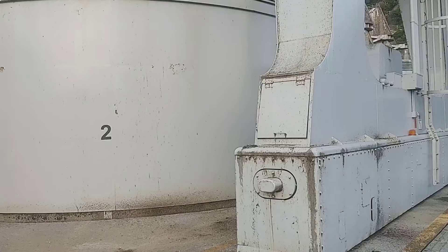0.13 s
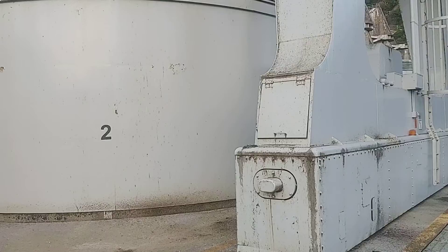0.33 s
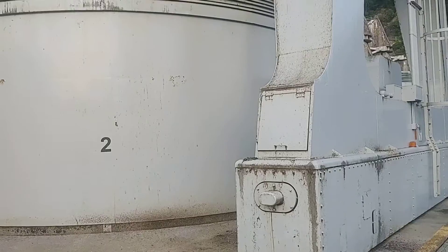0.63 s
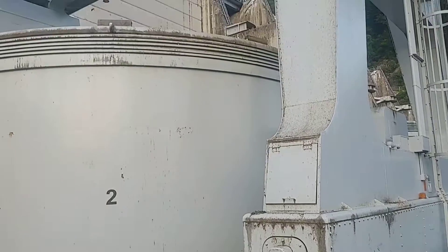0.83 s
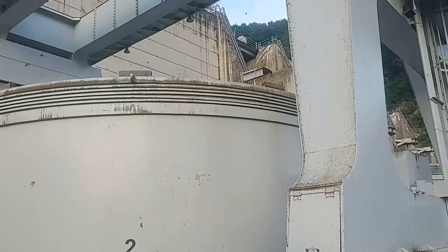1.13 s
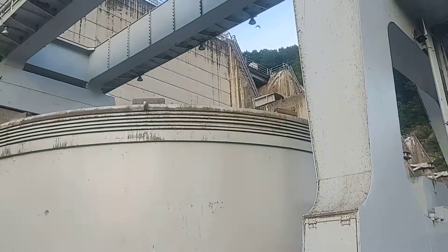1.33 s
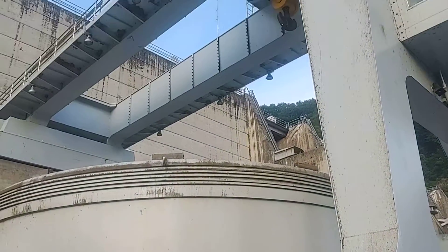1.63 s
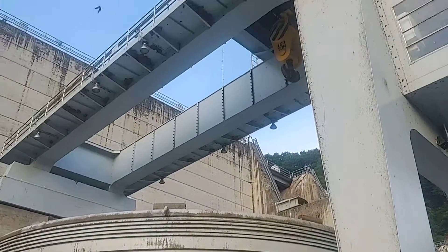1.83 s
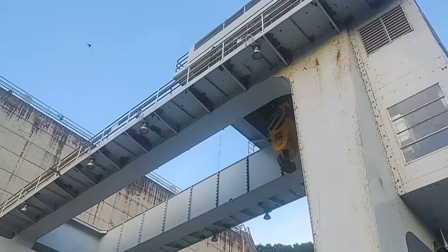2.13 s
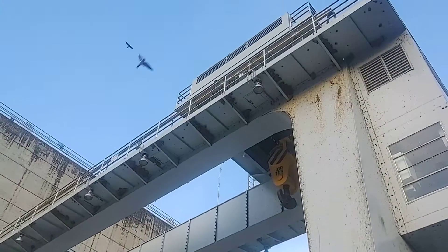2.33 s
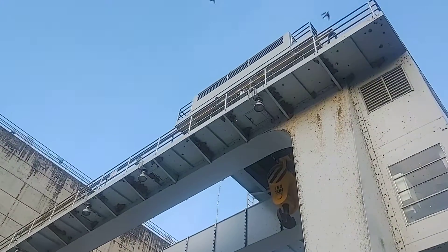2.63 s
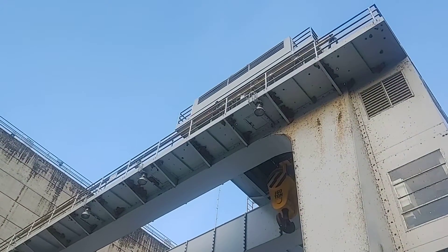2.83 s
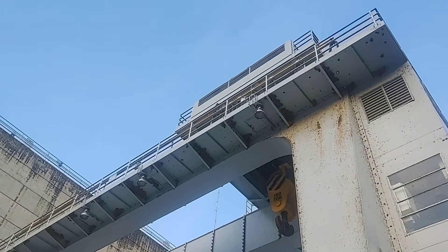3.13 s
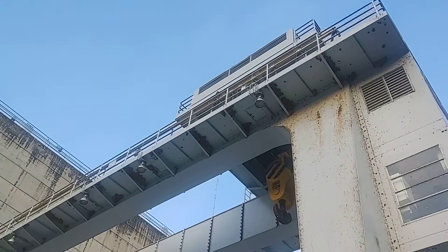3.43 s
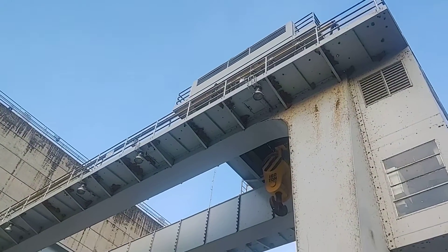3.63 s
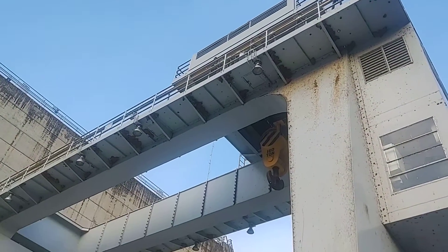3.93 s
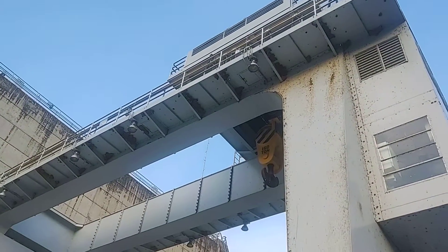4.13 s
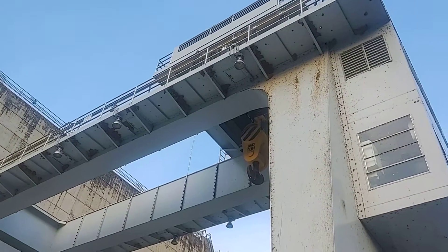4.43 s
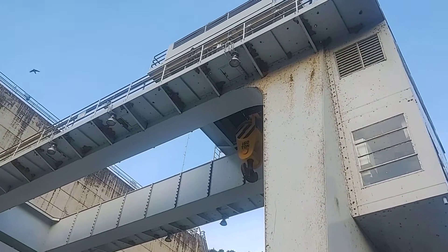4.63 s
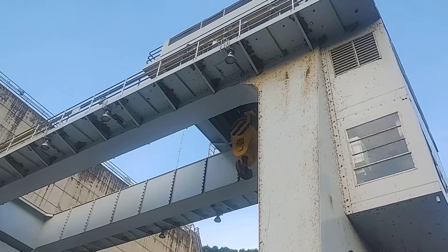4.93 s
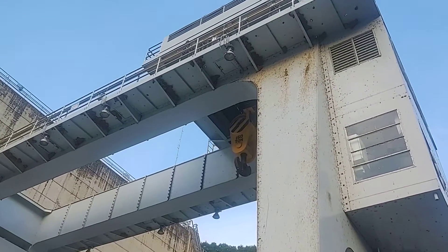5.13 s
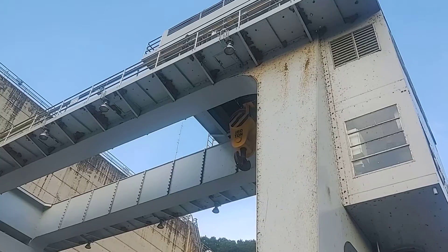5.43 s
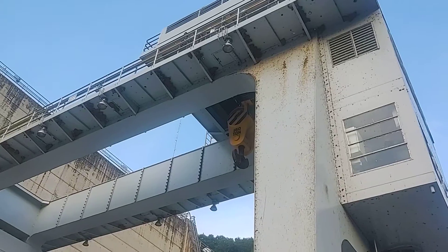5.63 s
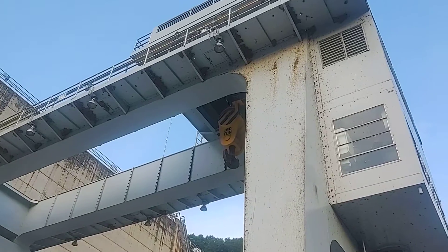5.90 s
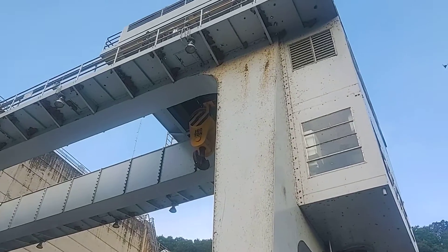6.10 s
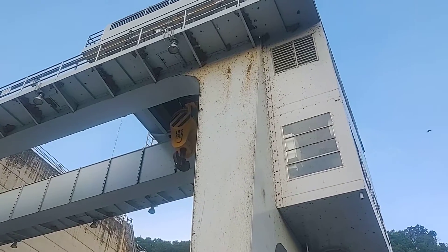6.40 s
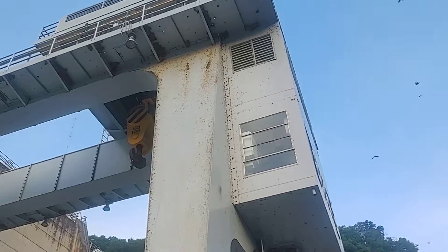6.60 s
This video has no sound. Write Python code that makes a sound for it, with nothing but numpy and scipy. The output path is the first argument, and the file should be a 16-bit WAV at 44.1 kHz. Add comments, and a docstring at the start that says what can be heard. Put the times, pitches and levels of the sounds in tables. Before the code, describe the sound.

A deep generator hum and airy fan noise sit under small birds' sharp chirps and hoarse alarm cries, dense at first, then sparse.

```python
"""At a dam, cliff swallows call around their nests under a steel gantry crane.
Falling alarm cries, arched chirps, rasps and creaks are harmonics of a membrane, weighted by the throat.
Girders and wall throw them back as scattered echoes and a duller tail; thin whistles lie above.
Below, a generator hums as steady tones, one of them beating, in the filtered noise of its cooling air.
The machinery swells at the start and settles; two faint knocks come near the end."""
import sys
import numpy as np
from scipy import signal
from scipy.fft import rfft, irfft
from scipy.io import wavfile
from scipy.ndimage import uniform_filter1d

SR = 44100
rng = np.random.default_rng(int(sys.argv[2]) if len(sys.argv) > 2 else 0)


def dump_mix(stems):
    """Bounce the given channels to the path in sys.argv[1] as a 16-bit WAV at rate SR."""
    frames = np.atleast_2d(stems).T  # one column per channel
    limited = np.clip(frames, -1, 1)  # hard clip at full scale
    pcm = np.round(limited * 32767).astype(np.int16)
    wavfile.write(sys.argv[1], SR, pcm)


N = 298116
TIME = np.arange(N) / SR  # s
BINS = np.arange(N // 2 + 1) * SR / N  # Hz
START_S = 0.292  # end of the opening silence
TOP_HZ = 15800  # upper limit of the sound

# Stereo width of the machinery. Each row: frequency in Hz, side minus mid in dB.
WIDTH = [(60, -20), (130, -17), (300, -9.5), (700, -6.5), (1300, 0), (16000, 1)]


def undb(db):
    """Decibels are logarithmic: 20 dB is a tenfold amplitude."""
    return 10 ** (np.asarray(db) / 20)


def curve(rows, at):
    """Linear interpolation between the rows."""
    return np.interp(at, *np.transpose(rows))


def colour(rows, hz):
    """A spectral envelope in dB, interpolated on a logarithmic frequency axis."""
    points, db = np.transpose(rows)
    return np.interp(np.log(hz + 1e-9), np.log(points), db)


def walk(rate, size):
    """Smoothed random steps: a fluctuation of spread 1 that changes about rate times a second."""
    hold = max(int(SR / rate), 1)
    steps = np.repeat(rng.standard_normal(size // hold + 3), hold)
    # averaging leaves 2/3 of the variance
    return np.sqrt(3 / 2) * uniform_filter1d(steps, hold)[hold:hold + size]


def add(track, start_s, sound, lag_count=3):
    """Interaural-style delay: the direction of a call makes the left port late by a few samples."""
    for channel, lag in enumerate((lag_count, 0)):
        first = max(int(start_s * SR) + lag, 0)
        part = sound[:max(N - first, 0)]
        track[channel, first:first + len(part)] += part


def spread(mid, side):
    """Sum and difference: mid and side become left and right."""
    return np.array([mid + side, mid - side])


def syrinx(hz, throat, jitter, flutter_db, treble_db=0, second_db=0, corner_hz=4000, count=12):
    """Source and filter: harmonics of an unsteady membrane, weighted by the throat; rms 1."""
    size = len(hz)
    phase = 2 * np.pi * np.cumsum(hz * (1 + jitter * walk(1100, size))) / SR
    k = np.arange(1, count + 1)[:, None]
    # the treble setting comes in over the octave above the corner
    treble = treble_db * np.clip(np.log2(k * hz / corner_hz), 0, 1)
    db = colour(throat, k * hz) + treble + second_db * (k == 2)
    audible = k * hz < TOP_HZ
    tone = np.sum(undb(db) * audible * np.sin(k * phase), axis=0)
    tone = tone * undb(flutter_db * walk(250.4, size))
    return tone / np.std(tone)


def gantry(sound, early_db, tail_db, early_t60=0.33, tail_t60=0.64):
    """Reverberation: nearby girders scatter a call at once; the dam wall adds a thin, duller tail."""
    t = np.arange(SR) / SR
    early, tail = rng.standard_normal((2, 2, SR))
    sparse = rng.random((2, SR)) < 0.02
    early = early * sparse * (t > 0.003) * undb(-60 * t / early_t60)
    tail = signal.lfilter(*signal.butter(1, 5000, fs=SR), tail)
    tail = tail * (t > 0.02) * undb(-60 * t / tail_t60)
    response = 0
    for db, part in ((early_db, early), (tail_db, tail)):
        response = response + undb(db) * part / np.linalg.norm(part, axis=1, keepdims=True)
    return sound + signal.fftconvolve(sound, response, axes=1)[:, :N]


def cries():
    """Frequency glide: each alarm cry rises briefly, then sweeps down while a hoarse voice grows in it."""
    # Alarm cries. Each row: start in seconds, length in seconds, top pitch in Hz, level in dB before
    # echoes and mix, treble in dB, second harmonic in dB, hoarse to clear power ratio at the end.
    cry_rows = [(0.297, .14, 1742, -51, -6, -6, .6), (0.48, 0.057, 2140, -58, 1, -6, .3),
                (0.629, 0.15, 1715, -48.5, -3, 6, 0.45), (1.121, .148, 1730, -55.5, 3, 7, 0.29),
                (1.8, 0.14, 1640, -56.5, -6, 4, 1.9), (2.493, .13, 1740, -57.5, -13, 9, 0.92),
                (4.827, .14, 1695, -61.5, 0, -3, .5), (5.416, 0.15, 1752, -56.5, 6, 8, .25),
                (6.055, .145, 1777, -55.5, 5, 8, .15), (6.599, .17, 1704, -57.5, 5, 6.5, .35)]
    # Pitch through a cry. Each row: share of its length, share of the top pitch.
    cry_shape = [(0, .87), (.1, .96), (.22, 1), (.36, .98), (.66, .87), (1, .71)]
    # Throat resonances in a cry. Each row: frequency in Hz, level in dB.
    cry_throat = [(1600, -22), (2600, -1), (3400, -1.3), (4500, 2.7), (5300, -3), (5900, -15), (6800, -18),
                  (8600, -17), (10800, -16), (12800, -27), (15000, -26)]
    brightening_db = 3  # treble gained from the start of a cry to its end
    out = np.zeros((2, N))
    for start, length, hz, db, treble_db, second_db, hoarse in cry_rows:
        u = np.linspace(0, 1, int(length * SR))
        pitch = hz * curve(cry_shape, u)
        tilt_db = treble_db + brightening_db * u
        clear = syrinx(pitch, cry_throat, jitter=0.007 + 0.016 * u, flutter_db=2.5,
                       treble_db=tilt_db, second_db=second_db)
        rough = syrinx(pitch, cry_throat, jitter=0.07, flutter_db=2.5, treble_db=tilt_db, second_db=-8)
        voice = clear + np.sqrt(np.abs(hoarse)) * u * rough
        swell = np.abs(np.sin(np.pi * u ** 1.25)) ** 0.55
        add(out, start, undb(db) * voice * swell, lag_count=2)
    return out


def arches(notes, jitter):
    """Joint pitch and amplitude arch: both rise and fall in a slightly burred note, further if longer."""
    # The throat follows the note. Each row: multiple of the top pitch, level in dB.
    chirp_throat = [(1, 0), (1.6, -30), (2, -28), (2.4, -30), (2.85, -20), (3.4, -38)]
    # Higher notes lose their overtones. Each row: top pitch in Hz, treble in dB.
    chirp_treble = [(4050, 1), (4350, -11)]
    arch_per_s = 3.3  # share of the top pitch by which the ends lie lower, per second of length
    flatness = 2.6  # of the top of the arch (2 = a parabola)
    out = np.zeros((2, N))
    for middle, length, hz, db in notes:
        u = np.linspace(0, 1, int(length * SR))
        pitch = hz * (1 - arch_per_s * length * np.abs(2 * u - 1) ** flatness)
        throat = np.array(chirp_throat) * [hz, 1]
        tone = syrinx(pitch, throat, jitter, flutter_db=2.5, treble_db=curve(chirp_treble, hz))
        add(out, middle - length / 2, undb(db) * tone * np.sin(np.pi * u) ** 0.7)
    return out


def chirps():
    """Frequency jitter burrs the chirps from the nests; the girders scatter them."""
    # Chirps. Each row: middle in seconds, length in seconds, top pitch in Hz, level in dB before
    # envelope, echoes and mix.
    chirp_rows = [(.647, .025, 3970, -45), (.82, 0.076, 4310, -43.5), (.868, .045, 3150, -48.5),
                  (1.03, 0.039, 3890, -52.5), (1.056, .03, 3280, -51.5), (1.077, 0.043, 4050, -49),
                  (1.247, .056, 3950, -47), (1.286, .045, 3320, -47.5), (1.294, .05, 3950, -47),
                  (1.368, .05, 3920, -52.5), (1.525, .055, 3740, -57), (1.593, .05, 3760, -54),
                  (1.657, 0.06, 3720, -56), (1.722, .05, 3940, -56.5), (1.824, .034, 3850, -53),
                  (2.195, 0.038, 3740, -57), (2.226, 0.027, 4050, -57), (2.252, 0.023, 4100, -59),
                  (2.403, .045, 4000, -59), (2.577, 0.044, 3820, -58), (2.835, .045, 3600, -61),
                  (2.957, .024, 4170, -55), (2.995, .024, 4200, -57), (4.168, 0.0268, 4260, -49),
                  (4.203, .022, 4260, -49), (5.593, .028, 4330, -42.5), (5.628, .027, 4350, -44),
                  (6.275, .03, 4370, -53), (6.313, .03, 4330, -50)]
    return gantry(arches(chirp_rows, jitter=0.031), early_db=-5, tail_db=-16, early_t60=0.06, tail_t60=0.5)


def creaks():
    """Pulsed phonation: a close bird's call scoops up, peaks clear at each push of air, sags hoarse between."""
    # Creaky calls. Each row: first push of air in seconds, length in seconds, pitch at that push in Hz,
    # rise of the pitch in Hz per second, pushes per second, level in dB before envelope, echoes and mix,
    # second harmonic in dB, treble in dB.
    creak_rows = [(4.823, .112, 1602, 2970, 35, -48.5, -0.5, 0),
                  (4.999, .103, 1590, 2800, 30.5, -50.5, -2, -1),
                  (6.275, 0.08, 2095, 900, 35, -52, -14, -21)]
    # Throat resonances in a creak. Each row: frequency in Hz, level in dB.
    creak_throat = [(1900, -24), (2600, -4), (3100, 2), (3500, -1), (4000, -15), (4700, -9), (5300, -5),
                    (5700, -9), (6200, -8), (6800, -13), (7500, -10), (9000, -19), (9600, -16),
                    (10800, -19), (11800, -30), (12700, -25), (16000, -31)]
    lead_s = 0.03  # from the start to the first push
    peak_width = 0.6  # of the pitch peak of a push (1 = nearly a sine)
    scoop_share, sag_share, drop_db = 0.33, 0.19, 6  # lowering of pitch at the start and between pushes
    out = np.zeros((2, N))
    for first_push, length, hz, rise_hz_per_s, pushes_per_s, db, second_db, treble_db in creak_rows:
        u = np.linspace(0, 1, int(length * SR))
        t = u * length - lead_s
        off_peak = np.sin(np.pi * pushes_per_s * np.maximum(t, 0))
        sag = 1 - np.exp(-(off_peak / peak_width) ** 2)
        scoop = np.maximum(-t / lead_s, 0)
        pitch = (hz + rise_hz_per_s * t) * (1 - sag_share * sag - scoop_share * scoop)
        tone = syrinx(pitch, creak_throat, jitter=0.009 + 0.026 * (sag + scoop), flutter_db=2.2,
                      treble_db=treble_db, second_db=second_db, corner_hz=6500)
        level = undb(db - drop_db * (sag + scoop)) * np.sqrt(np.abs(np.sin(np.pi * u)))
        add(out, first_push - lead_s, level * tone)
    return gantry(out, early_db=-7, tail_db=-16, early_t60=0.06, tail_t60=0.6)


def rasps():
    """Joint modulation: pushes of air raise pitch and loudness together; a thin resonance adds a sheen."""
    # Hoarse rasps. Each row: start in seconds, length in seconds, top pitch in Hz, level in dB between
    # pushes before envelope, echoes and mix, treble in dB, sheen in dB.
    rasp_rows = [(0.536, .11, 1603, -54, 4, -3), (1.098, 0.085, 1600, -58.5, 3, -3),
                 (1.793, 0.065, 1890, -51.5, -11, 2), (2.38, .06, 1700, -62, -10, 0),
                 (2.543, 0.13, 1640, -62.5, -13, 0), (2.807, 0.053, 1650, -65, -10, 0),
                 (2.902, 0.09, 1600, -65, -3, 0), (4.118, 0.14, 1636, -63, -3, 0),
                 (4.197, 0.15, 1680, -60, -6, 11), (4.492, 0.063, 1610, -62.5, -4, 0),
                 (4.677, .05, 1640, -63, -4, 0), (5.552, 0.068, 1586, -57, -14, 0),
                 (6.213, 0.094, 1610, -60.5, 2, 2)]
    # Throat resonances in a rasp. Each row: frequency in Hz, level in dB.
    rasp_throat = [(1800, -22), (3000, -2), (3700, -5), (4800, -1), (5600, -8), (6400, -10), (8500, -14),
                   (10800, -17), (12000, -23), (16000, -28)]
    pushes_per_s, stagger = 38, 0.1  # mean rate, and scatter as a share of a period
    sag_share, throb_db = 0.17, 5  # drop in pitch and level between pushes
    sheen_hz, sheen_width_hz = 12700, 600
    ring = signal.iirpeak(sheen_hz, sheen_hz / sheen_width_hz, fs=SR)
    out = np.zeros((2, N))
    for start, length, hz, db, treble_db, sheen_db in rasp_rows:
        u = np.linspace(0, 1, int(length * SR))
        cycles = pushes_per_s * u * length + stagger * walk(pushes_per_s, len(u))
        sag = np.cos(np.pi * cycles) ** 2
        tone = syrinx(hz * (1 - sag_share * sag), rasp_throat, jitter=0.085, flutter_db=2,
                      treble_db=treble_db)
        tone = tone + (undb(sheen_db) - 1) * signal.lfilter(*ring, tone)
        level = undb(db + throb_db * (1 - sag)) * np.sqrt(np.abs(np.sin(np.pi * u)))
        add(out, start, level * tone)
    return out


def whistle(glide_s=0.035):
    """Exponential glide: faint wiry tones slide up to their pitch, waver, swell early and die away."""
    # Whistles. Each row: start in seconds, length in seconds, pitch in Hz, peak level in dB.
    whistle_rows = [(.72, .4, 11200, -74), (1.05, .4, 15500, -82)]
    scoop_share = 0.11  # of the pitch, by which they start low
    out = np.zeros((2, N))
    for start, length, hz, db in whistle_rows:
        u = np.linspace(0, 1, int(length * SR))
        waver = 0.003 * walk(600, len(u)) + 0.007 * walk(22, len(u))
        pitch = hz * (1 - scoop_share * np.exp(-u * length / glide_s)) * (1 + waver)
        tone = np.sin(2 * np.pi * np.cumsum(pitch) / SR)
        add(out, start, undb(db) * tone * np.sin(np.pi * np.sqrt(u)) ** 2)
    return out


def colony(db=-69.5, count=60):
    """Random superposition: birds further off twitter at independent, uniformly drawn moments."""
    when, long, high, far = rng.random((count, 4)).T
    notes = zip(when * N / SR, 0.021 + 0.04 * long, 3400 + 1100 * high, db - 5 * far)
    return arches(notes, jitter=0.06)


def whine_db():
    """Exponential decay, a straight line in dB: the whine slowly fades, and stands out once on the way."""
    crest_s, crest_width_s, crest_db = 2.82, 0.76, 8.5
    crest = crest_db / (1 + ((TIME - crest_s) / crest_width_s) ** 2)
    return -68.5 - 0.8 * TIME + crest  # fades by 0.8 dB per s


def generator(beat_db=-15.5, waver=0.4):
    """Interference: short waves waver more among the walls; a slower motor beats with the magnetic hum."""
    # Generator tones. Each row: multiple of the mains frequency, level in dB before the swell.
    hum = [(4 / 3, -64), (2, -42), (8 / 3, -59.5), (4, -55), (6, -64), (8, -60), (10, -62.5), (12, -66.5),
           (14, -70.5), (22, -68.5), (24, -72), (28, -88)]
    mains_hz, whine_hz = 60, 2015
    beat_hz, beat_dip_s = 2.02, 3.03  # rate of the beat, and the moment of one of its dips
    out = np.zeros((2, N))
    for multiple, db in hum:
        hz = multiple * mains_hz
        depth = np.clip(waver * hz / 600, 0, 0.7)
        carrier = undb(db) * np.sqrt(2) * np.exp(2j * np.pi * hz * TIME)
        mid = (1 + depth * (walk(4, N) + 1j * walk(4, N))) / np.sqrt(1 + 2 * depth ** 2)
        side = depth * undb(colour(WIDTH, hz)) * (walk(3.12, N) + 1j * walk(2.5, N))
        if multiple == 2:  # the main tone
            mid = mid - undb(beat_db) * np.exp(-2j * np.pi * beat_hz * (TIME - beat_dip_s))
        start_phase = np.exp(2j * np.pi * rng.random())
        out += np.real(spread(mid, side) * carrier * start_phase)
    for channel in out:
        phase = 2 * np.pi * whine_hz * TIME + 0.55 * walk(21, N)
        channel += undb(whine_db()) * np.sqrt(2) * np.sin(phase)
    return out


def cooling_air(flicker_db=0.45):
    """Resonant filtering: fan noise rings the casing, alike at both ports in the bass, diffuse in the treble."""
    # Spectrum of the air before the casing and the swell. Each row: frequency in Hz, level in dB per Hz.
    air = [(25, -100), (50, -92.5), (75, -77), (200, -78), (400, -82), (700, -85), (1100, -87.5),
           (2200, -92), (3200, -99), (4600, -104), (6500, -115), (11000, -123), (16000, -128)]
    # Casing resonances. Each row: frequency in Hz, width in Hz, height in dB.
    casing = [(83.5, 12, 5), (123, 10, 16), (230.6, 9.8, 6.3), (283.4, 38, 4.4), (766, 290, 3.15),
              (1350, 44, 4.2), (1436, 24, 4.6), (2074, 320, 3.64)]
    db = colour(air, BINS)
    for hz, width, peak_db in casing:
        db = db + peak_db / (1 + (2 * (BINS - hz) / width) ** 2)
    mid, side = rfft(rng.standard_normal((2, N))) * undb(db) * np.sqrt(SR / 2)
    noise = irfft(spread(mid, side * undb(colour(WIDTH, BINS))), N)
    return noise * undb(flicker_db * walk(14, N))


def swell_db():
    """Relaxation: the machinery rises to a brief swell, holds it and settles exponentially in dB."""
    attack_s, hold_s, release_s = 0.25, 0.26, 0.21
    top_db, rise_db = 7.5, 18  # top of the swell over the steady level, and over its start
    rise = np.clip((TIME - START_S) / attack_s, 0, 1)
    settling = np.maximum(TIME - START_S - attack_s - hold_s, 0)
    return top_db * np.exp(-settling / release_s) - rise_db * (1 - rise) ** 2


def knocks(body_hz=48):
    """Damped vibration: a finger shifts on the case, giving a tiny noise tick and a soft thump."""
    # Handling knocks. Each row: start in seconds, thump level in dB, tick level in dB, both before decay.
    knock_rows = [(5.423, -50, -67), (6.663, -56, -65)]
    out = np.zeros((2, N))
    t = np.arange(SR // 8) / SR
    for start, thump_db, tick_db in knock_rows:
        thump = np.sin(2 * np.pi * body_hz * t) * np.exp(-t / 0.015)
        tick = rng.standard_normal(len(t)) * np.exp(-t / 0.0014)
        add(out, start, undb(thump_db) * thump + undb(tick_db) * tick)
    return out


def scene():
    """Superposition: birds under the gantry, over the machinery."""
    alarm = gantry(cries(), early_db=-6, tail_db=-12, early_t60=0.06, tail_t60=0.6)
    chatter = gantry(rasps(), early_db=-4, tail_db=-10, early_t60=0.12, tail_t60=0.6)
    far_birds = gantry(colony(), early_db=-3, tail_db=1.5)
    near_birds = undb(-3.5) * alarm + undb(-4) * chirps() + undb(1.5) * creaks() + undb(-3) * chatter
    swell = swell_db()
    # the hum swells less than the air
    machinery = generator() * undb(0.78 * swell) + cooling_air() * undb(swell)
    return near_birds + far_birds + whistle() + machinery + knocks()


def record(dry):
    """Linear filtering: each port has its own colour; sound opens after a silence and the top is cut."""
    # Colour of the two microphone ports. Each row: frequency in Hz, left minus right in dB.
    ports = [(200, -.5), (380, 1.5), (700, -1.4), (1300, -3.5), (2400, 2), (4200, 3), (6000, 5.5),
             (8000, -6), (11000, -8.5), (15000, -2)]
    tilt_db = colour(ports, BINS) / 2
    sound = irfft(rfft(dry) * undb(np.array([tilt_db, -tilt_db])), N)
    sound = sound * np.clip((TIME - START_S) / 0.007, 0, 1)  # opens within 7 ms
    return signal.sosfilt(signal.ellip(10, 0.2, 80, TOP_HZ, fs=SR, output="sos"), sound)


dry = scene()
out = record(dry)
dump_mix(out)
```